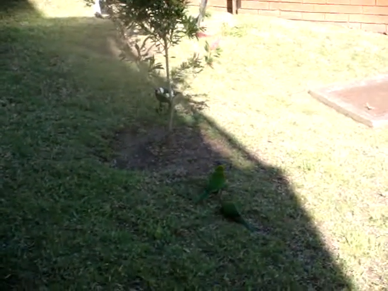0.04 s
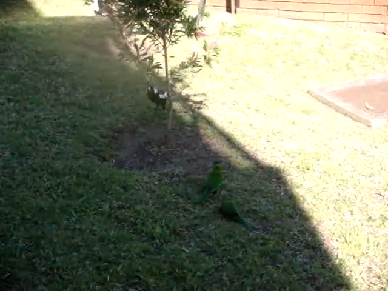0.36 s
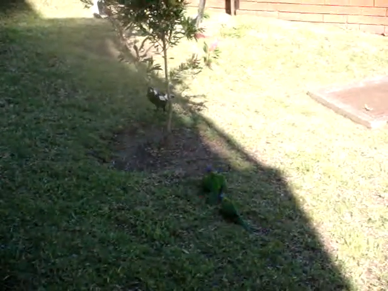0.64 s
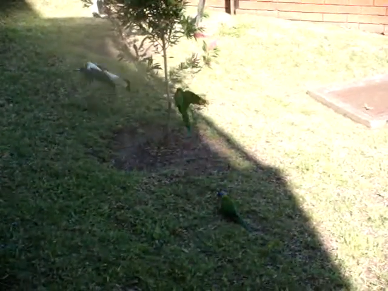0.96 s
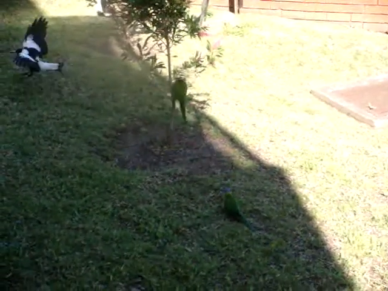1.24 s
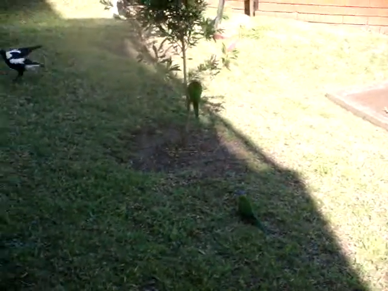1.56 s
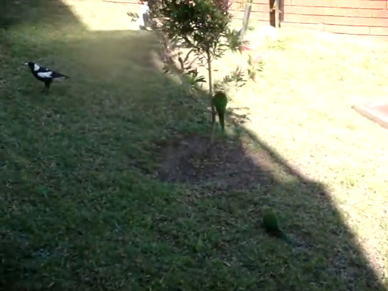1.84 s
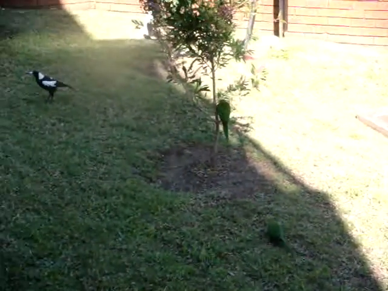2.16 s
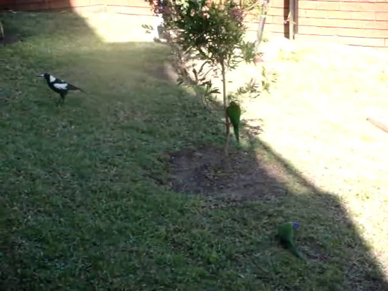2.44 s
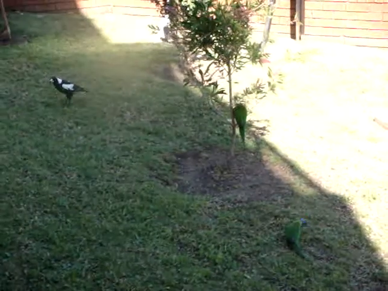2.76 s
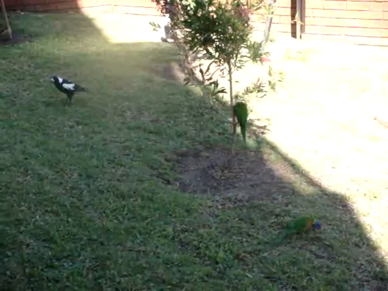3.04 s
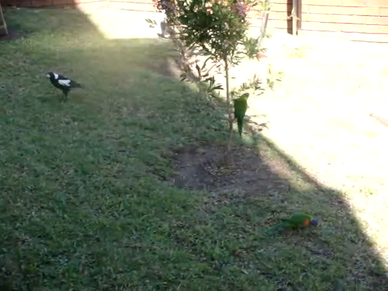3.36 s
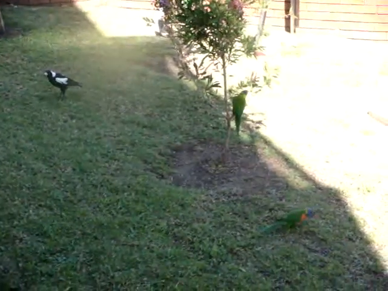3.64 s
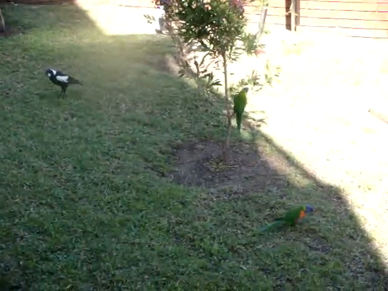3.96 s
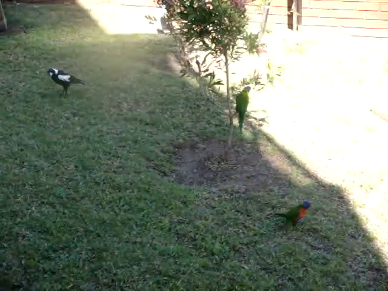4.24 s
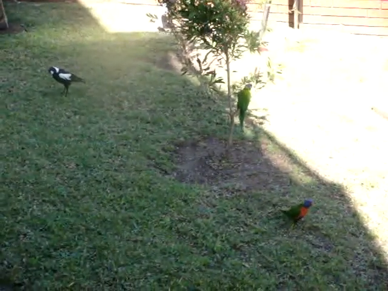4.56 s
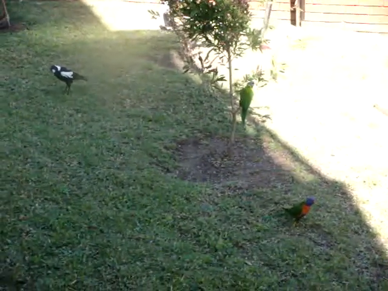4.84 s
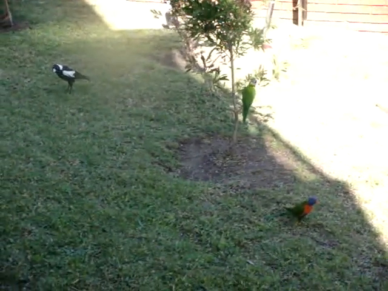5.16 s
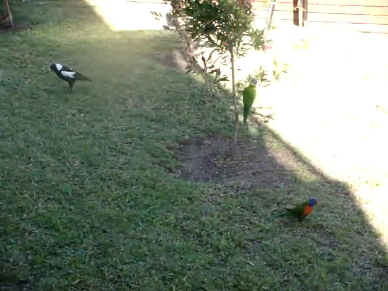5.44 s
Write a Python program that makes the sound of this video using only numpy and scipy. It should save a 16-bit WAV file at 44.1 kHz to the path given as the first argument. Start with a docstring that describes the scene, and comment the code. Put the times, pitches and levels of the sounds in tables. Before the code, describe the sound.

Five sharp, slightly raspy alarm whistles slide downward from a nearby bird in a garden: a pair, another pair, then a single one. Further from the microphone, a magpie gives one harsh squawk after the first pair, and lorikeets screech and chatter, most busily after the second. Behind them a car fades away, a far engine hums low and a distant flock twitters faintly.

```python
"""A bird close by gives five loud, falling alarm whistles across a fenced back lawn.
Its syrinx snaps onto each note and slides down while the overtones fray. In between, lorikeets screech
and chatter, and a magpie gives one harsh squawk as it flies off. Underneath, a car recedes on the road
beyond the fence and a far engine drones. Ground, house and fence throw the calls back,
and a limiter ducks the mix under the loudest whistles."""
import sys
import numpy as np
from scipy import signal
from scipy.fft import rfft, irfft
from scipy.io import wavfile
from scipy.ndimage import uniform_filter1d

SR = 44100
rng = np.random.default_rng(int(sys.argv[2]) if len(sys.argv) > 2 else 0)


def wav_out(sig):
    """Save sig, one row per channel (or a flat mono array), as 16-bit PCM at SR to the path in sys.argv[1]."""
    wavfile.write(sys.argv[1], SR, np.round(np.clip(np.atleast_2d(sig).T, -1, 1) * 32767).astype(np.int16))


N = 247401
TIME = np.arange(N) / SR

# EQ curves of the road's tyre roar, low rumble, hiss and top-end sizzle: [f/Hz, level/dB]
TYRE_EQ = [(500, -22.5), (640, -1.5), (800, 0), (950, 0.5), (1100, -3.5), (1250, -10.5), (1450, -33.5)]
RUMBLE_EQ = [(25, -9), (50, -10), (80, -7), (130, -5), (200, -4.5), (270, -0.5), (350, -4.5), (450, -3.5),
             (580, -4.5)]
HISS_EQ = [(1250, 3.5), (1600, 4.5), (2000, 2), (3000, -5), (4500, -7.5), (6500, -14), (10000, -22)]
SIZZLE_EQ = [(3000, 1), (10000, -9.5)]
# the car's exhaust note, sinking as it leaves: [t/s, f/Hz, level/dB]
EXHAUST_CURVE = [(0, 108.6, -43), (.65, 105.9, -42), (1.0, 98.6, -43), (1.6, 85.4, -56.5), (2.2, 74.5, -52),
                 (5.6, 56, -65)]
# the far engine's firing rate and fader ride: [t/s, f/Hz, level/dB]
ENGINE_CURVE = [(0, 77.9, -2), (1.5, 78.87, 5), (2.5, 78, -7), (3.2, 78.06, 4), (4.4, 78.8, 2),
                (5.1, 77.1, 3.5), (5.6, 76.3, 2.5)]
# its partials ahead of that fader: [harmonic number, level/dB]
ENGINE_PARTIALS = [(1, -54), (2, -62.5), (3, -49.5), (4, -51.5), (5, -61.5)]
# swells of chatter in the trees further off: [centre t/s, half-width/s, level/dB]
CHATTER_SWELLS = [(3.05, .05, -38), (3.57, 0.14, -44.5), (4.6, .16, -45.5)]
# alarm whistle cues: [t/s, length/s, from f/Hz, to f/Hz, overshoot/Hz, fundamental level/dB,
#   crest as share of length, dip delay/s, dip depth/dB, octave level/dB,
#   octave fade/dB at one note length from its crest, upper overtone level/dB, 3rd harmonic lift/dB]
WHISTLE_CUES = [ (0.223, 0.22, 2205, 1784, 105, -8, 0.83, 0.1, -1, -23, 29, -24.5, -1.5),
                (0.587, 0.16, 2272, 1820, -69, -13.5, 0.83, 0.1, 2.5, -28, 15, -30, 0),
                (2.522, 0.24, 2274, 1827, 161.5, -3.5, 0.94, 0.077, 14.5, -22, 13, -20.5, 1.5),
                (2.854, .192, 2148, 1823, 221, -11, 0.8, 0.053, 8, -27, 11, -29, 4.5),
                (4.773, 0.21, 2237, 1809, 192, -14, 0.72, 0.088, 7.5, -22.5, 65, -31.5, 7)]
# the beak's colour on the whistle's upper overtones: [f/Hz, level/dB]
BEAK_EQ = [(5400, 9.5), (6000, -6.5), (6700, -9.5), (7400, -5.5), (8400, 0), (9100, -3), (9900, -1.5),
           (11000, -52)]
# lorikeet cues: [t/s, length/s, mid-note f/Hz, glide/Hz, arch/Hz, level/dB,
#   relative 2nd harmonic level/dB, relative 3rd harmonic level/dB, roughness (0 is clean)]
LORIKEET_CUES = [ (1.064, .12, 3650, -770, 448, -44, -20, -27, .55),
                 (1.946, 0.045, 1855, 190, 0, -42, -14, -24, 0.1),
                 (2.283, 0.082, 1742, -22, 48, -57.5, 11.5, 4, .9),
                 (2.494, 0.022, 2200, 129, -69, -35.5, -13, -19, 0.37),
                 (2.957, .048, 2190, -24, 33, -49, 18, 0, 0.15),
                 (2.993, 0.029, 3000, -130, -135, -34, 1, -6, 0.1),
                 (3.02, 0.052, 2114, -58, 14, -25.5, 3, -5, 0.12),
                 (3.036, 0.0664, 2066, -57, -60.5, -25, -9.5, 0.5, .02),
                 (3.057, 0.068, 2790, -260, -55, -33.5, -2.5, -13, .4),
                 (3.113, 0.047, 3893, 0, 100, -30.5, -24, -10, .2),
                 (3.139, 0.074, 3250, 40, 72, -37, -3.5, -18, .28),
                 (3.17, 0.31, 3840, -43, 50, -48.5, -17, -9, .4),
                 (3.189, 0.034, 3017, -78, -143, -29.5, -19, -27, 0),
                 (3.222, .05, 3110, -220, 44, -37.5, -13, -22, 0.2),
                 (3.282, 0.076, 3300, 293, 79, -40.5, -9, -16, .5),
                 (3.338, .15, 2430, -290, -0.5, -46.5, -5, -7.5, .92),
                 (3.452, 0.099, 2580, 200, 126, -40.5, -28, -18, 0.72),
                 (3.462, 0.046, 1744, 32, -120, -43, -20, -18, .7),
                 (3.544, .015, 2157, -58, 35, -28.5, -0.5, -11, 0.37),
                 (4.073, 0.151, 1580, -55, 21.5, -51.5, -1, -1, 1.07),
                 (4.266, 0.085, 1936, 280, -110, -44, -20, -29, 0.4),
                 (4.361, 0.04, 1894, 213, -25, -40.5, -21, -16, 0.42),
                 (4.708, 0.064, 1890, 82, 0, -44.5, -27, -13, 0.37),
                 (5.043, .023, 2180, 97, -38, -45, -12, -26, .7),
                 (5.422, .079, 3650, -1160, 435, -48, -32, -25, 0.43)]
# the scratch in a rough lorikeet note: [f/Hz, level/dB]
SCRATCH_EQ = [(1800, 20.5), (2600, -4.5), (3600, 3), (4800, 11), (6300, 8), (7500, -36), (10000, -7)]
# the magpie's throat resonances: [f/Hz, level/dB]
THROAT_EQ = [(1100, -9), (2200, 0.5), (3300, 4), (4400, -2.5), (5500, -3.5), (6600, -10), (7700, -13),
             (8800, -9.5), (9900, -7)]
# early reflections off ground, house and fence: [delay t/s, level/dB]
REFLECTIONS = [(.0045, -21.5), (0.014, -26), (.024, -19), (.041, -29.5)]


def from_db(db):
    """Decibels to gain."""
    return 10 ** (np.asarray(db) / 20)


def unit_rms(x):
    """Normalise to an rms of 1."""
    return x / np.sqrt(np.mean(x ** 2) + 1e-20)


def automation(rows):
    """One lane per value column, ramping between the timed breakpoints."""
    times, *columns = np.transpose(rows)
    return [np.interp(TIME, times, column) for column in columns]


def eq_gain(eq, hz):
    """An EQ curve's gain at the given frequencies."""
    freqs, db = np.transpose(eq)
    return from_db(np.interp(np.log(np.maximum(hz, 1)), np.log(freqs), db))


def wobble(hz, size=N):
    """A random modulator, rms about 1, rolling off above hz."""
    f = np.fft.rfftfreq(N, 1 / SR)
    return unit_rms(irfft(rfft(rng.standard_normal(N)) / (1 + (f / hz) ** 2), N))[:size]


def coloured_noise(eq):
    """Unit-rms noise through an EQ curve, rolled off beyond its ends."""
    f = np.fft.rfftfreq(N, 1 / SR)
    skirts = np.minimum(1, f / eq[0][0]) ** 2 / np.maximum(1, f / eq[-1][0]) ** 4
    return unit_rms(irfft(rfft(rng.standard_normal(N)) * eq_gain(eq, f) * skirts, N))


def phase_of(hz):
    """Running phase of a moving pitch."""
    return 2 * np.pi * np.cumsum(hz) / SR


def gate(start, end, fade_s):
    """A note's sample indices and its smooth fade in and out."""
    at = np.flatnonzero((TIME > start) & (TIME < end))
    from_edge_s = np.minimum(TIME[at] - start, end - TIME[at])
    return at, np.sin(np.pi / 2 * np.clip(from_edge_s / fade_s, 0, 1)) ** 2


def bump(t, centre, width):
    """A bell curve of height 1."""
    return np.exp(-((t - centre) / width) ** 2)


def receding(start_db, doubling_s, loss_db):
    """Level of a source moving steadily away: loss_db per doubling of distance, first at doubling_s."""
    return start_db - loss_db * np.log2(1 + TIME / doubling_s)


def receding_car():
    """Road noise and exhaust draw away, the top end going first; the road swells again at the end."""
    swell_db = 6 * bump(TIME, centre=5.67, width=0.59)
    tyres = from_db(receding(-26.5, 0.65, 5.79) + swell_db) * coloured_noise(TYRE_EQ)
    rumble = from_db(receding(-34.5, 1, 3.7) + 0.44 * swell_db) * coloured_noise(RUMBLE_EQ)
    hiss = from_db(receding(-28.5, 0.23, 3.79) + 0.86 * swell_db) * coloured_noise(HISS_EQ)
    exhaust_hz, exhaust_db = automation(EXHAUST_CURVE)
    exhaust = np.sqrt(2) * from_db(exhaust_db + 1.2 * wobble(6)) * np.sin(phase_of(exhaust_hz))
    sizzle = from_db(receding(-35.5, 0.46, 9.1)) * coloured_noise(SIZZLE_EQ)
    return tyres + rumble + hiss + sizzle + exhaust


def far_engine(fading_db=1.5, waver=0.0036, drift_rad=0.7):
    """A low drone whose partials fade and drift in phase on their way through the air."""
    firing_hz, fader_db = automation(ENGINE_CURVE)
    phase = phase_of(firing_hz * (1 + waver * wobble(3.6)))
    out = np.zeros(N)
    for k, db in ENGINE_PARTIALS:
        drift = rng.uniform(0, 2 * np.pi) + drift_rad * wobble(3)
        out += from_db(db + fading_db * wobble(7.8)) * np.sin(k * phase + drift)
    return np.sqrt(2) * from_db(fader_db) * out


def distant_flock(count=900, low_hz=1900, high_hz=3900, glide=0.15, jitter=0.04, bed_db=-57.5):
    """Scratchy little chirps at random times and pitches blur into a warbling bed with three swells."""
    out = np.zeros(N)
    shake = 1 + jitter * wobble(540)
    for when, size, height, slope, softness in rng.random((count, 5)):
        start, length = when * TIME[-1], 0.024 + 0.039 * size
        at, fades = gate(start, start + length, length / 2)
        bend = 1 + glide * (2 * slope - 1) * (TIME[at] - start) / length
        pitch = low_hz * (high_hz / low_hz) ** height * bend
        phase = phase_of(pitch * shake[at])
        out[at] += from_db(-8 * softness) * fades * (np.sin(phase) + from_db(-13) * np.sin(2 * phase))
    swells = sum(from_db(db) * bump(TIME, centre, width) for centre, width, db in CHATTER_SWELLS)
    return (from_db(bed_db) + swells) * unit_rms(out)


def alarm_whistles(snap_s=0.016, snap_hz=743, settle_s=0.03, catch_s=0.0042, rasp=0.47, fray=0.47,
                   attack_s=0.031, release_s=0.015, jitter=0.0076, waver=0.0025):
    """The syrinx snaps down onto its note, then slides lower; the overtones fray as the call runs out."""
    out = np.zeros(N)
    unsteady = 1 + jitter * wobble(330) + waver * wobble(50)
    shimmer = from_db(wobble(170))
    overtones = range(2, 6)
    flutter = {k: from_db(3 * wobble(49)) for k in overtones}
    grit = {k: (wobble(160) + 1j * wobble(180)) / 2 for k in overtones}
    for (start, length, from_hz, to_hz, overshoot_hz, db, crest, dip_s, dip_db,
         octave_db, octave_fade_db, upper_db, gape_db) in WHISTLE_CUES:
        at, fades = gate(start - snap_s, start + length + 0.0017, fade_s=0.008)
        t = np.maximum(TIME[at] - start, 0)
        along = t / length
        snap = np.maximum(start - TIME[at], 0) / snap_s
        slide_hz = from_hz + (to_hz - from_hz) * along
        pitch = slide_hz + overshoot_hz * np.exp(-t / settle_s) + snap_hz * snap
        phase = phase_of(pitch * unsteady[at])
        # faint and pure until the note catches and the overtones bloom
        bloom = 0.5 + 0.5 * np.tanh((TIME[at] - start - catch_s) / 0.001)
        effort_db = -10 * (1 - bloom) - 12 * np.exp(-t / attack_s)
        effort_db -= 13.5 * np.exp((t - length) / release_s)
        # the fundamental arches over its crest; the octave peaks early; the top speaks last
        fundamental = from_db(db - 11 * (along - crest) ** 2 - dip_db * bump(t, dip_s, width=0.016))
        octave = from_db(octave_db - octave_fade_db * (along - 0.29) ** 2)
        upper = from_db(upper_db - 22 * np.exp(-t / 0.0084) - 10.5 * along)
        gape = from_db(gape_db * bump(along, centre=0.41, width=0.25))   # the beak is widest mid-call
        hoarseness = rasp + fray * along ** 3
        tone = fundamental * np.sin(phase)
        for k in overtones:
            level = octave if k == 2 else upper * eq_gain(BEAK_EQ, k * pitch)
            if k == 3:
                level = level * gape
            rough = 1 + hoarseness * (k - 1) ** 0.77 * grit[k][at]   # raspier towards the top
            tone += bloom * level * flutter[k][at] * np.imag(rough * np.exp(1j * k * phase))
        out[at] += np.sqrt(2) * tone * from_db(effort_db) * fades * shimmer[at]
    return out


def lorikeets(jitter=0.075, flutter_db=2.5):
    """Short gliding, arching notes; pitch shake and scratch turn clear squeaks into hoarse chatter."""
    out = np.zeros(N)
    shake = wobble(500)
    flutter = from_db(flutter_db * wobble(120))
    scratch = from_db(-3) * coloured_noise(SCRATCH_EQ)
    for start, length, hz, glide_hz, arch_hz, db, second_db, third_db, rough in LORIKEET_CUES:
        at, fades = gate(start, start + length, fade_s=0.17 * length)
        across = 2 * (TIME[at] - start) / length - 1
        pitch = hz + glide_hz * across / 2 - arch_hz * across ** 2
        phase = phase_of(pitch * (1 + jitter * rough * shake[at]))
        partials = from_db([0, second_db, third_db, third_db - 15])
        tone = sum(gain * np.sin(k * phase) for k, gain in enumerate(partials, 1))
        out[at] += from_db(db) * (np.sqrt(2) * tone + rough * scratch[at]) * fades * flutter[at]
    return out


def magpie_squawk(start=1.27, end=1.723, held_hz=1093, scoop_hz=80, sag_hz=28, droop_hz=280,
                  rise_s=0.075, fall_s=0.01, jitter=0.0263, buzz_db=1.5):
    """A harsh call scoops up, holds and droops: jittery harmonics and hiss through the same throat."""
    at, fades = gate(start, end, fade_s=0.008)
    scoop = np.maximum(1 - ((TIME[at] - start) / rise_s) ** 2, 0)
    sag = bump(TIME[at], centre=1.462, width=0.025)
    droop = np.exp((TIME[at] - end) / fall_s)
    pitch = held_hz - scoop_hz * scoop - sag_hz * sag - droop_hz * droop + 9 * wobble(14.3, len(at))
    level_db = -38.5 - 11 * scoop - 5 * sag - 10 * droop
    phase = phase_of(pitch * (1 + jitter * wobble(374, len(at))))
    tone = sum(eq_gain(THROAT_EQ, k * pitch) * np.sin(k * phase) for k in range(1, 10))
    low_cut = signal.butter(1, 3200, "high", fs=SR, output="sos")
    hiss = from_db(-5) * signal.sosfilt(low_cut, coloured_noise(THROAT_EQ)[at])
    out = np.zeros(N)
    out[at] = (tone + hiss) * fades * from_db(level_db + buzz_db * wobble(160, len(at)))
    return out


def garden_reverb(x, tail_db, t60, damping_hz=4500, build_s=0.024):
    """A few hard reflections, then a dark tail scattered from walls and trees."""
    t = TIME[:SR]
    scatter = rng.standard_normal(SR) * from_db(-60 * t / t60) * np.minimum(t / build_s, 1)
    tail = signal.sosfilt(signal.butter(1, damping_hz, fs=SR, output="sos"), scatter)
    passband_gain = np.sqrt(np.sum(tail ** 2) * SR / (np.pi * damping_hz))
    tail *= from_db(tail_db) / passband_gain
    echoes = sum(from_db(db) * np.interp(TIME - delay, TIME, x) for delay, db in REFLECTIONS)
    return x + echoes + signal.fftconvolve(x, tail)[:N]


def limiter(x, ceiling_db=-8.5, release_db_per_s=70):
    """The gain ducks fast when the short-term level passes the ceiling, then creeps back."""
    level_db = 10 * np.log10(np.abs(uniform_filter1d(x ** 2, size=130)) + 1e-12)
    over_db = np.maximum(level_db - ceiling_db, 0)
    release_ramp = release_db_per_s * TIME
    cut_db = np.maximum.accumulate(over_db + release_ramp, axis=-1) - release_ramp
    return x * from_db(-uniform_filter1d(cut_db, size=90))


def scene():
    """A mono mix: whistles up front and nearly dry, the other birds wetter, car and engine behind."""
    foreground = garden_reverb(alarm_whistles(), tail_db=-26.5, t60=1.0)
    midground = garden_reverb(magpie_squawk() + lorikeets() + distant_flock(), tail_db=-10, t60=0.27)
    return (foreground + midground + receding_car() + far_engine())[None]


def record(dry, asymmetry=0.043, low_cut_hz=18, high_cut_hz=10050):
    """The microphone bends loud peaks slightly to one side; then low cut, limiter and steep high cut."""
    low_cut = signal.butter(1, low_cut_hz, "high", fs=SR, output="sos")
    high_cut = signal.ellip(14, 0.1, 90, high_cut_hz, fs=SR, output="sos")
    bent = signal.sosfilt(low_cut, dry + asymmetry * dry ** 2)
    return signal.sosfilt(high_cut, limiter(bent))


dry = scene()
out = record(dry)
wav_out(out)
```